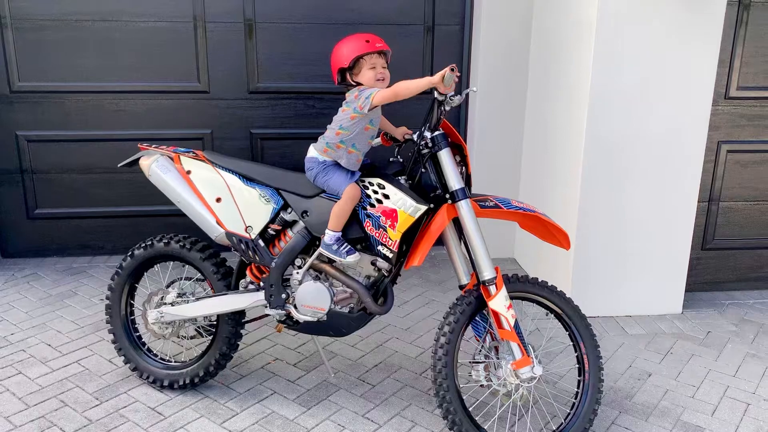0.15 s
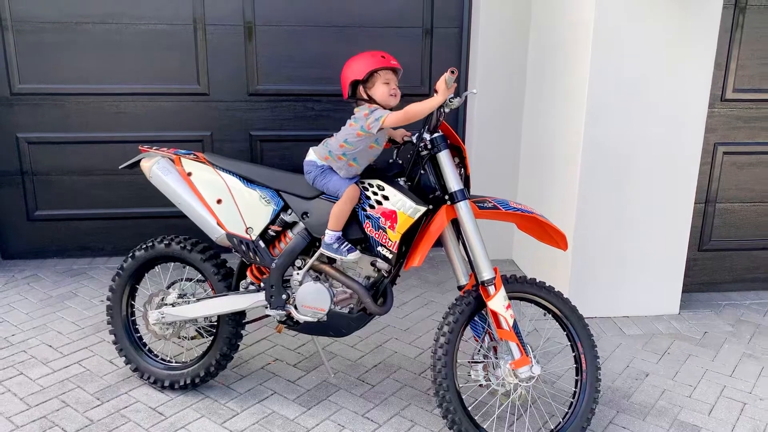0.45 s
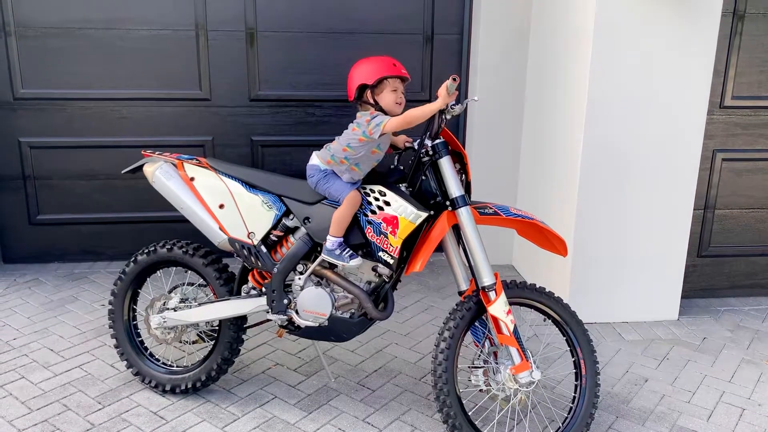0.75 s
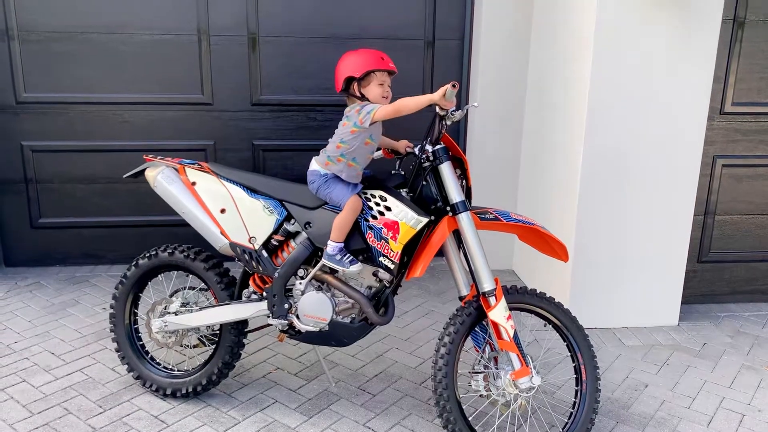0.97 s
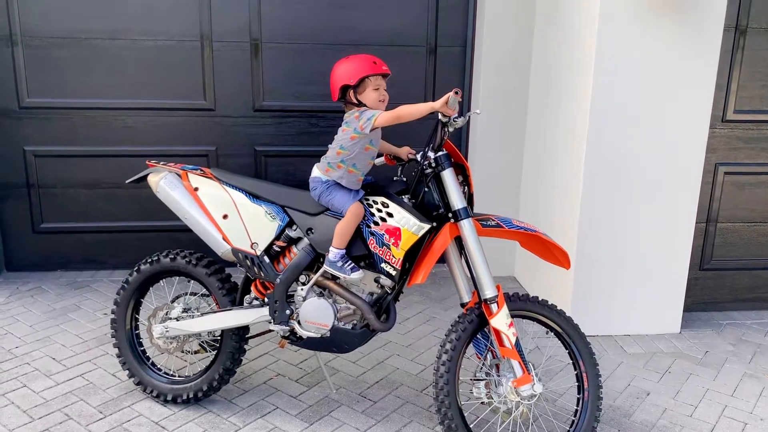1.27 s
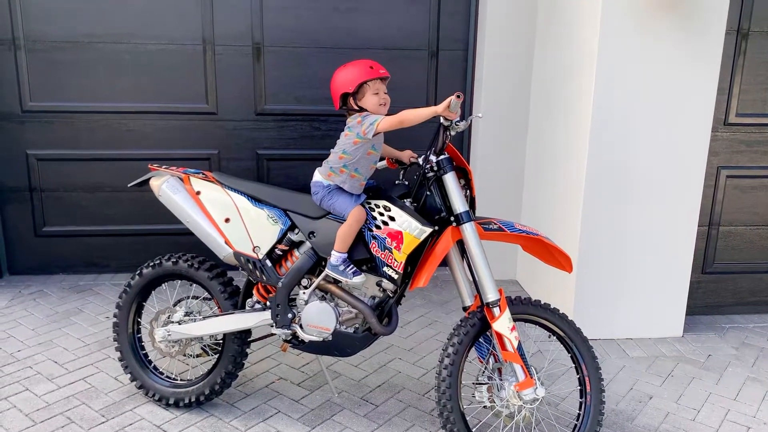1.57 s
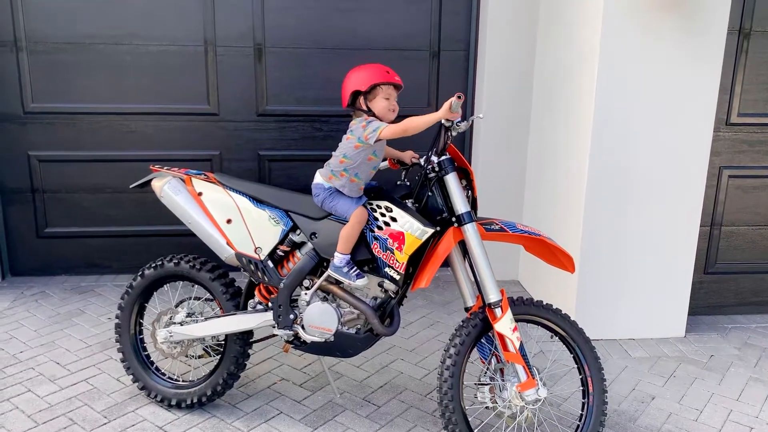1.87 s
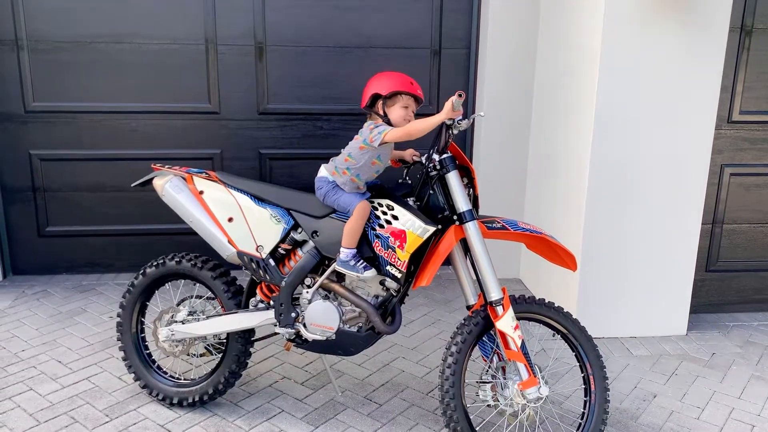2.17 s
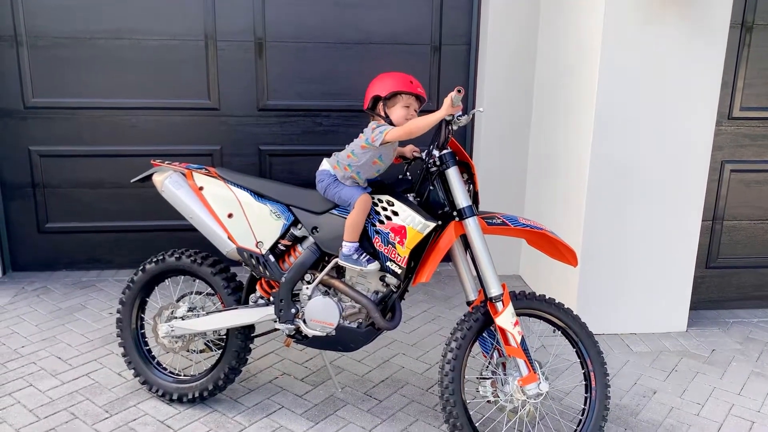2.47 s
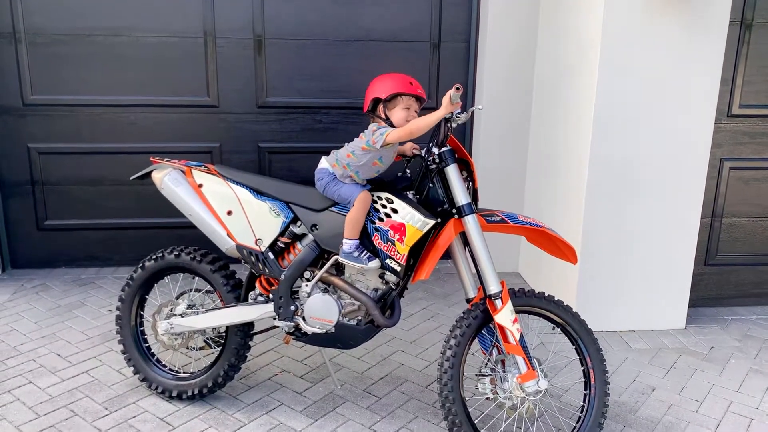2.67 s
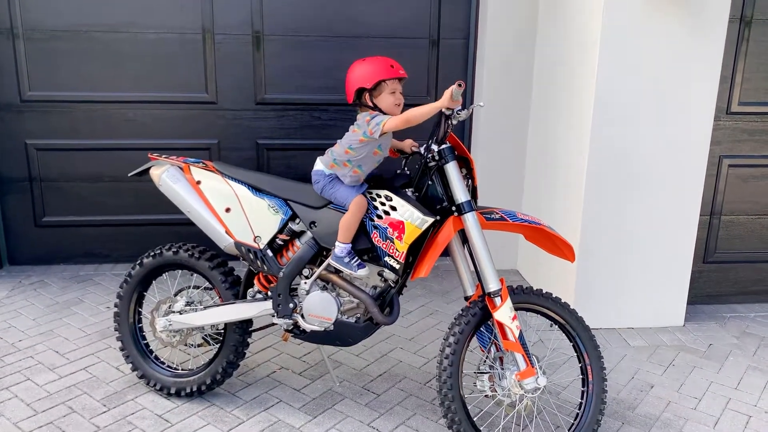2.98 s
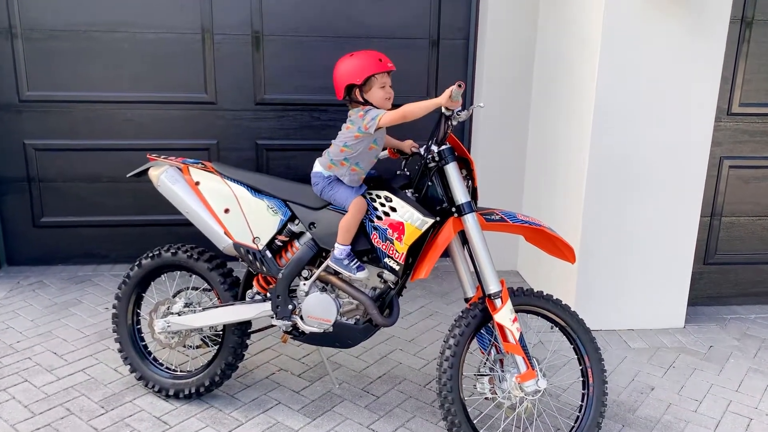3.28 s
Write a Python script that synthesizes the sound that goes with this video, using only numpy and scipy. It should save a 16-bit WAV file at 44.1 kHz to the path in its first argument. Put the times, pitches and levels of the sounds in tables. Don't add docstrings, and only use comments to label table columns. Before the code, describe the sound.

A single-cylinder dirt bike engine idles and is revved twice, barking sharply beside a garage door.

```python
import sys
import numpy as np
from scipy import signal
from scipy.fft import rfft, irfft, next_fast_len
from scipy.io import wavfile
from scipy.ndimage import uniform_filter1d

SR = 44100
rng = np.random.default_rng(int(sys.argv[2]) if len(sys.argv) > 2 else 0)


def pcm_store(signal):
    levels = np.round(np.clip(np.atleast_2d(signal), -1, 1) * 32767)
    wavfile.write(sys.argv[1], SR, levels.astype(np.int16).T)


def rack_gain(trim_db):
    fader = np.asarray(trim_db, float)
    return 10 ** (fader / 20)


N = 151263

# t/s, rate/(cycles per s)
SPEED = [(0.0, 17.49), (0.295, 20.61), (0.414, 36.19), (0.665, 52.57), (0.86, 49.97), (1.029, 40.92),
         (1.233, 29.83), (1.441, 26.32), (1.441, 22.78), (1.82, 20.53), (1.981, 21.45), (2.083, 27.36),
         (2.193, 36.06), (2.404, 40.96), (2.574, 50.35), (2.933, 53.54), (3.151, 43.35), (3.43, 27.58)]
# t/s, throttle (bark) level/dB, silencer pressure level/dB, burn (sharpness of crack) level/dB
LOAD = [(.07, -32.5, -18.5, 1.5), (.26, -31.5, -15, 4), (.35, -18.5, -13, 7.5), (.5, -19.5, -24.5, 1.5),
        (.68, -18.5, -20.5, -3), (.77, -30.5, -26, -1), (.84, -32, -17, -4.5), (1.08, -31.5, -19, -0.5),
        (1.26, -40, -26.5, -6.5), (1.47, -40.5, -20.5, -0.5), (1.7, -45, -24.5, 1.5), (1.98, -35, -19, 1.5),
        (2.2, -23, -17, -0.5), (2.4, -18.5, -24.5, -3.5), (2.84, -20, -21.5, -4), (2.93, -33.5, -19, 1.5),
        (3.2, -34, -20.5, -0.5), (3.43, -38.5, -21, -4)]
# t/s, thump change level/dB, bark change level/dB
ODD_CYCLES = [(1.21, 2.5, -2), (1.415, 4, 2.5), (1.64, 3.5, 0), (2.92, -3, -2.5), (2.975, 1.5, 0),
              (3.122, -0.5, -2), (.36, -1, -0.5), (.39, 0, 0), (.226, -1, -2), (.275, -2, -2),
              (.586, -1, 1), (1.83, -0.5, -0.5), (2.055, 2.5, 2.5), (2.16, 0.5, 0.5), (2.19, -0.5, 2.5),
              (2.728, -9, 3.5), (.845, -36, -2), (.884, -13, -3), (.948, -3.5, -3), (1.064, 5, 4),
              (1.147, -10, 1), (1.176, 2.5, 2.5), (1.245, -5, -3), (1.375, 4, -0.5), (1.505, -9, -9),
              (1.595, -5.5, -12), (1.685, -13, -10), (2.612, 3, 4.5), (2.805, -6, 0.5), (2.9, -32, 0),
              (2.94, -26, -3), (2.998, -33, -2), (3.036, -4, -1.5), (3.103, 0.5, 0.5), (3.078, 4, 0),
              (3.193, 3, 1), (3.215, -4, -1), (3.243, -3, -3.5), (3.285, 1, 2.5), (3.357, -2, 0),
              (3.39, -8, -21)]
# f/Hz, level/dB, start after the valve t/s, swell t/s, sharpness of the swell
SILENCER = [
    (122, 0, -.0034, .019, 7),
    (124, -17, .0048, .02, 1.1),
]
# f/Hz, level/dB, start after the valve t/s, swell t/s, sharpness of the swell
SLAP = [
    (150, -1, .0012, .0128, 13),
    (215, -5, .0093, .004, 2.5),
]
# f/Hz, level/dB
DRONE = [(45, -4), (100, 5.5), (150, -5.5), (205, 1), (260, -1.5), (310, -2), (420, -10), (600, -14),
         (680, -4), (770, -9), (850, -6), (1000, -17)]
# f/Hz, level/dB, start after the valve t/s, swell t/s, sharpness of the swell
PIPE = [(247, 2, -.004, 0.0034, 1.32), (318.3, 1, -.004, 0.0038, 1.24), (402, -4, -.004, 0.003, 1.18),
        (513.4, -1.5, -.004, 0.0036, 0.97)]
# f/Hz,
# level/dB, start after the valve t/s, swell t/s, sharpness of the swell
AIRBOX = [(679, -5, -.004, 0.0052, 0.92), (837.4, -5.5, -.0035, 0.0035, 1.85), (1227, 2, -.0033, .002, 1.5),
          (1345, -2.5, -.0033, 0.0023, 1.74), (1563.6, 1.5, -.0033, 0.0027, 1.27),
          (1643, -8.5, -.0037, 0.0028, 1.8), (1902, -11.5, -.0037, 0.0042, 0.91),
          (2740, -19.5, -.0037, .004, 1.2)]
# f/Hz, level/dB per Hz
RASP = [(400, -2), (600, -5.5), (850, 3.5), (1020, -0.5), (1300, 0.5), (1550, 0.5), (2000, -33),
        (3000, -27)]
# f/Hz, level/dB per Hz
HISS = [(1800, -2), (4440, -8), (5230, -12), (8000, -10.5), (11200, -11), (11800, -28), (12400, -11),
        (14300, -16)]
# f/Hz, width f/Hz, level/dB
CASES = [(2675, 13, -1), (3230, 60, 4), (3860, 63, 1.5), (4460, 130, 3.5), (6070, 140, 3.5),
         (9950, 430, -0.5)]
# f/Hz, level/dB per Hz
RATTLE = [(45, 6.5), (80, -41), (200, 4.5), (500, -5), (1000, -8), (2000, -15), (4000, -11.5)]
# t/s, length t/s, level/dB
MOANS = [
    (.73, 0.11, -30.5),
    (2.85, .15, -28),
]
# f/Hz, likeness 0 to 1
ALIKE = [(60, .97), (300, .97), (1200, .88), (3000, .5), (8000, .68), (13000, .88)]
# f/Hz, phase/radians
LEAD = [(100, 0), (600, .45), (1640, 1.5), (4000, 1.6), (10800, 1.8), (11900, 3.1), (12800, 1.7),
        (15300, 1.5)]
# delay t/s, left level/dB, right level/dB
WALLS = [(.0031, -17, -14), (.006, -9, -3.5), (.0094, -15, -1.5), (0.0126, -11.5, -6.5), (0.02, -7, -6)]
# f/Hz, level/dB
LEAN = [(60, -4.5), (180, -1.5), (550, 0), (1650, 4), (4970, -2), (15000, -0.5)]

FULL_DB = -21


def unit(x):
    return x / np.sqrt(np.mean(x ** 2) + 1e-20)


def along(points, hz):
    f, v = np.transpose(points)
    return np.interp(np.log(hz + 1), np.log(f + 1), v)


def curves(rows):
    s, *cols = np.transpose(rows)
    return [np.interp(np.arange(N) / SR, s, c) for c in cols]


def filtered(x, response):
    m = next_fast_len(N + SR // 2)
    return irfft(rfft(x, m) * response(np.fft.rfftfreq(m, 1 / SR)), m)[..., :N]


def rush(gain):
    shared, own = rng.standard_normal((2, N))

    def shared_gain(hz):
        lead = np.interp(hz, *np.transpose(LEAD))
        return gain(hz) * np.clip(along(ALIKE, hz), 0, 1) * np.exp(-1j * lead)

    def own_gain(hz):
        return gain(hz) * np.sqrt(1 - np.clip(along(ALIKE, hz), 0, 1) ** 2)

    left = filtered(shared, gain)
    right = filtered(shared, shared_gain) + filtered(own, own_gain)
    return unit(np.array([left, right]))


def train(times, sizes):
    return np.bincount(np.clip(np.round(times * SR).astype(int), 0, N - 1), sizes, N)


def rung(modes, times, sizes, loose_db, loose_s):
    t, out = np.arange(SR // 5) / SR, np.zeros(N)
    for hz, db, start, swell, sharp in modes:
        luck = rng.standard_normal((len(times), 2))
        envelope = (t / swell * np.exp(1 - t / swell)) ** sharp
        ring = rack_gain(db) * np.sin(2 * np.pi * hz * t) * envelope
        spikes = train(times + start + loose_s * luck[:, 0], sizes * rack_gain(loose_db * luck[:, 1]))
        out += signal.fftconvolve(spikes, ring)[:N]
    return out


def puffs(times, sizes, decay_s):
    t = np.arange(SR // 5) / SR
    early_s, rise_s = .0045, .0012
    puff = np.exp(-t / decay_s) * (1 - np.exp(-t / rise_s))
    return signal.fftconvolve(train(times - early_s, sizes), puff)[:N]


def patchy(x):
    z = signal.stft(x, nperseg=512)[2]
    field = uniform_filter1d(rng.standard_normal(z.shape[1:]), size=3, axis=0)
    field = uniform_filter1d(field, size=5, axis=1)
    patch_db = 2
    return unit(signal.istft(z * rack_gain(patch_db * unit(field)), nperseg=512)[1][:, :N])


def firing(speed, burn_db):
    turns = -.2768 + np.cumsum(speed) / SR
    at = np.searchsorted(turns, np.arange(1, int(turns[-1]) + 1))
    luck = rng.standard_normal((len(at), 3))
    jitter_s, scatter_db = .0001, .9
    times = at / SR + jitter_s * luck[:, 0]
    lost_burn_db = np.clip(-burn_db[at], 0, None)
    thump_db = (scatter_db + .15 * lost_burn_db) * luck[:, 1]
    bark_db = scatter_db * luck[:, 2]
    for s, thump_change_db, bark_change_db in ODD_CYCLES:
        nearest = np.argmin(abs(times - s))
        thump_db[nearest] = thump_change_db
        bark_db[nearest] = bark_change_db
    return turns, at, times, thump_db, bark_db + burn_db[at]


def silencer_thump(times, push_db, throttle_db, octaves, thin):
    boom_fades_db, slap_grows_db = -3, 3.5
    boom_db = push_db + boom_fades_db * (octaves + 1)
    boom_db = boom_db - 0.13 * (throttle_db - FULL_DB + 12.5)
    slap_db = push_db + slap_grows_db * octaves
    boom = 10.45 * rung(SILENCER, times, rack_gain(boom_db) / thin, loose_db=2.0, loose_s=0)
    slap = 7 * rung(SLAP, times, rack_gain(slap_db) / thin, loose_db=5.0, loose_s=0)
    return boom + slap


def drone(turns, speed, throttle_db):
    lag_s, spread, order_count = .0128, .05, 20
    late = np.roll(turns, round(lag_s * SR))
    tones = []
    for k in range(1, order_count + 1):
        offset = spread * np.sqrt(k) * rng.standard_normal()
        tones.append(-rack_gain(along(DRONE, k * speed)) * np.cos(2 * np.pi * (k * late + offset)))
    coasting = rack_gain(-37 + 3.3 * np.log2(speed / 50)) * unit(sum(tones[3:]))
    pulling = rack_gain(-23.5 + 1.8 * (throttle_db - FULL_DB)) * unit(sum(tones))
    return pulling + coasting


def pipe_bark(times, throttle_db, bark_db, thin):
    pipe_db = FULL_DB - 1.5 + 0.43 * (throttle_db - FULL_DB)
    return 9.2 * rung(PIPE, times, rack_gain(pipe_db + bark_db) / thin, loose_db=1.5, loose_s=.00004)


def airbox_bark(times, throttle_db, bark_db, burn_db, thin):
    burn_share = 0.077
    airbox_db = throttle_db + bark_db - (1 - burn_share) * burn_db
    return 8.92 * rung(AIRBOX, times, rack_gain(airbox_db) / thin, loose_db=1.2, loose_s=.00006)


def gas_rasp(times, throttle_db, bark_db, burn_db):
    color = [(250, -50)] + RASP + [(6000, -50)]
    flow = .4 * rack_gain(burn_db / 2) + puffs(times, rack_gain(bark_db), decay_s=.0045)
    return rack_gain(throttle_db - 2.5) * flow * rush(lambda hz: rack_gain(along(color, hz)))


def air_hiss(times, at, throttle_db, bark_db, burn_db, octaves):
    burn_share = 1.3
    spit_db = bark_db + (burn_share - 1) * burn_db[at]
    puff_db = spit_db - 3 * (octaves[at] + 1.5)
    puff = 1.6 * puffs(times, rack_gain(puff_db), decay_s=.011)
    first_spit = rack_gain(-1.5) * puffs(times, rack_gain(spit_db), decay_s=.003)
    gusts = 1 + puff + first_spit
    color = [(500, -53)] + HISS + [(14750, -42), (15700, -52)]

    def gain(hz):
        ringing_db = sum(db / (1 + ((hz - center) / width) ** 2) for center, width, db in CASES)
        return rack_gain(along(color, hz) + ringing_db)

    hiss_db = -22 + 0.52 * (throttle_db - FULL_DB) + 1 * octaves
    return rack_gain(hiss_db) * gusts / 2 * patchy(rush(gain))


def rattle(octaves):
    color = [(25, -29)] + RATTLE + [(9000, -48)]
    return rack_gain(-29.5 + 3 * octaves) * rush(lambda hz: rack_gain(along(color, hz)))


def slide_whistle(throttle_db):
    center_hz, width_hz = 7550, 200
    return rack_gain(throttle_db - 24) * rush(lambda hz: 1 / (1 + ((hz - center_hz) / width_hz) ** 2))


def moan():
    t, out = np.arange(N) / SR, np.zeros(N)
    start_hz, sag_hz_per_s = 493, 180
    for s, length, db in MOANS:
        since = t - s
        progress = np.clip(since / length, 0, 1)
        swell = np.sqrt(abs(np.sin(np.pi * progress)))
        out += rack_gain(db) * swell * np.sin(2 * np.pi * (start_hz - sag_hz_per_s * since / 2) * since)
    return out


def yard(x):
    def delay(hz, s):
        return np.exp(-2j * np.pi * hz * s)

    def paths(hz):
        total = np.array([delay(hz, 0), delay(hz, .0001)])
        for s, left_db, right_db in WALLS:
            both_s = s + np.array([[0], [s / 9]])
            total = total + rack_gain([[left_db], [right_db]]) * delay(hz, both_s)
        return total

    return filtered(x, paths)


def scene():
    speed, = curves(SPEED)
    throttle_db, pressure_db, burn_db = curves(LOAD)
    turns, at, times, thump_db, bark_db = firing(speed, burn_db)
    octaves = np.log2(speed / 50)
    thin = np.sqrt(speed[at])
    push_db = pressure_db[at] + thump_db

    low = silencer_thump(times, push_db, throttle_db[at], octaves[at], thin)
    low = low + drone(turns, speed, throttle_db) + moan()
    pipe = pipe_bark(times, throttle_db[at], bark_db, thin)
    airbox = airbox_bark(times, throttle_db[at], bark_db, burn_db[at], thin)
    noise = gas_rasp(times, throttle_db, bark_db, burn_db)
    noise = noise + air_hiss(times, at, throttle_db, bark_db, burn_db, octaves)
    noise = noise + rattle(octaves) + slide_whistle(throttle_db)

    echoed = 0.31
    mix = low + (1 - echoed) * pipe + yard(airbox + echoed * pipe) + noise
    return filtered(mix, lambda hz: rack_gain(along(LEAN, hz) * np.array([[.5], [-.5]])))


def roll_off(x):
    return signal.sosfilt(signal.butter(12, 15750, fs=SR, output="sos"), x)


def record(dry):
    low_cut_hz, top_hz, start_s, ceiling = 30, 15700, .0712, 1.02
    x = filtered(dry, lambda hz: (1j * hz / (low_cut_hz + 1j * hz)) ** 2 * (hz < top_hz))
    x = x * (np.arange(N) >= start_s * SR)
    mix = x / (1 + abs(x / ceiling) ** 4) ** (1 / 4)
    return roll_off(mix)


dry = scene()
out = record(dry)
pcm_store(out)
```